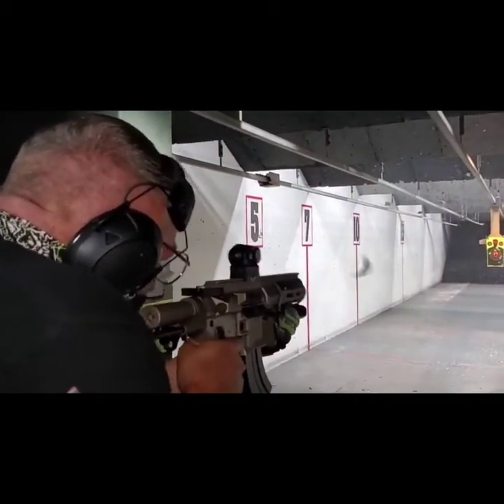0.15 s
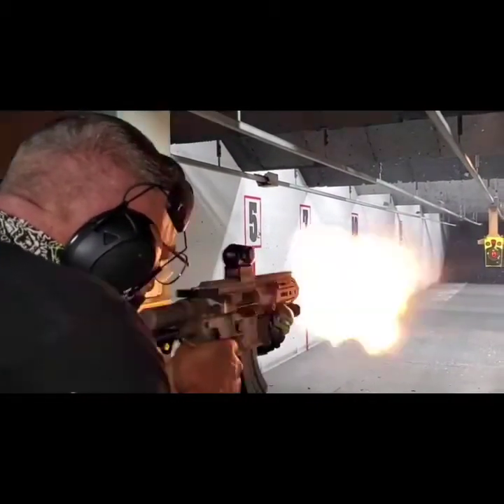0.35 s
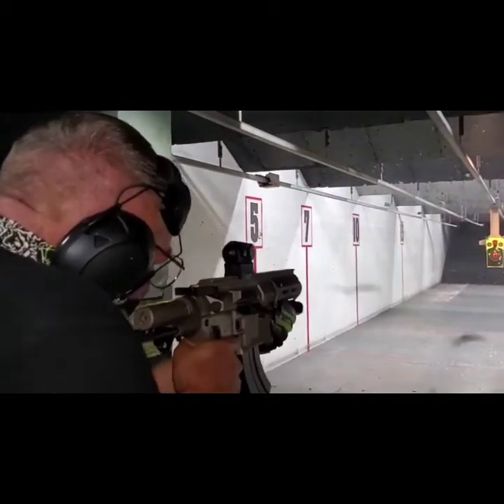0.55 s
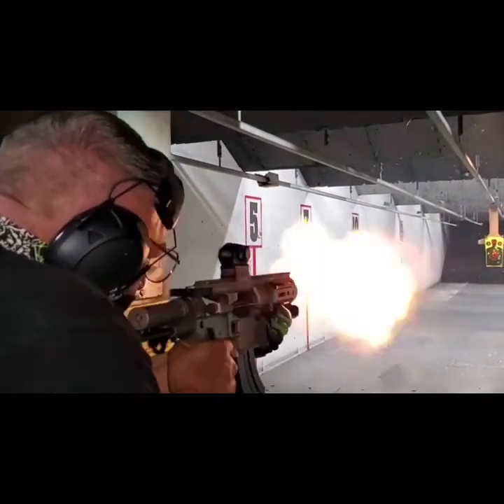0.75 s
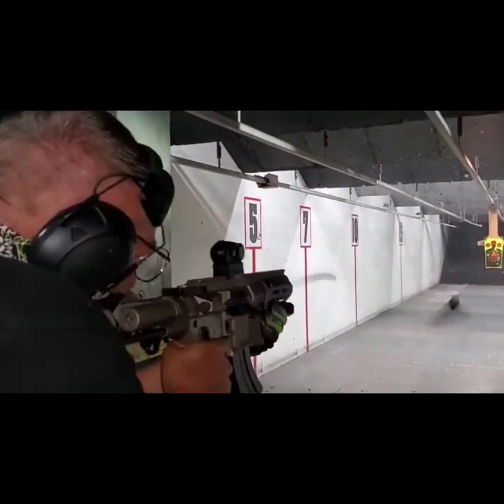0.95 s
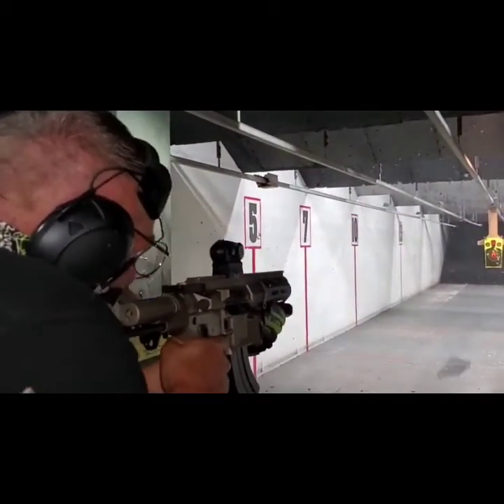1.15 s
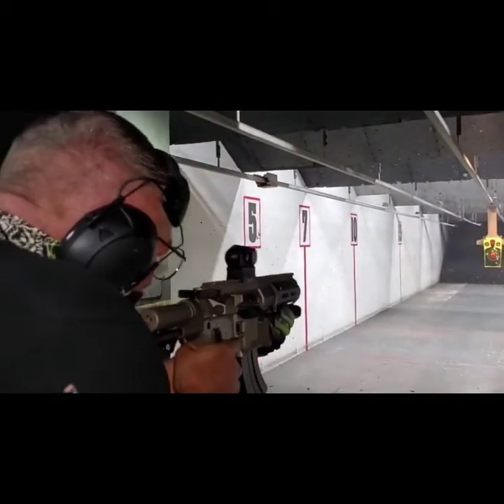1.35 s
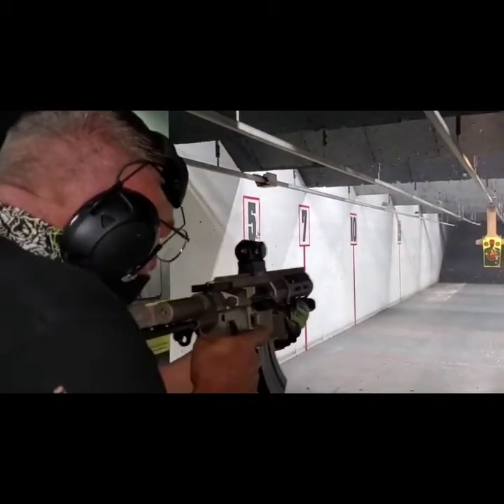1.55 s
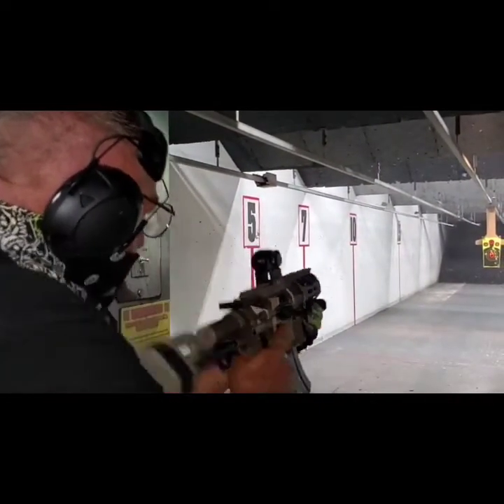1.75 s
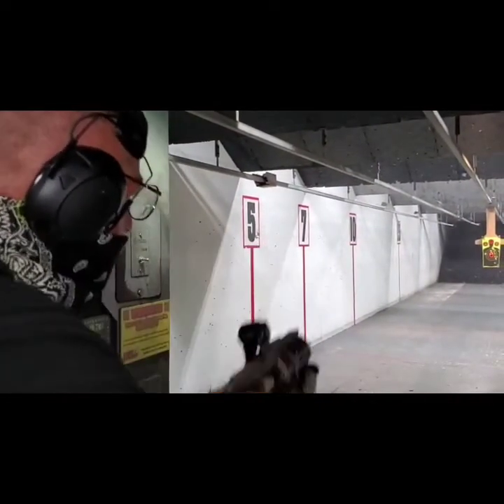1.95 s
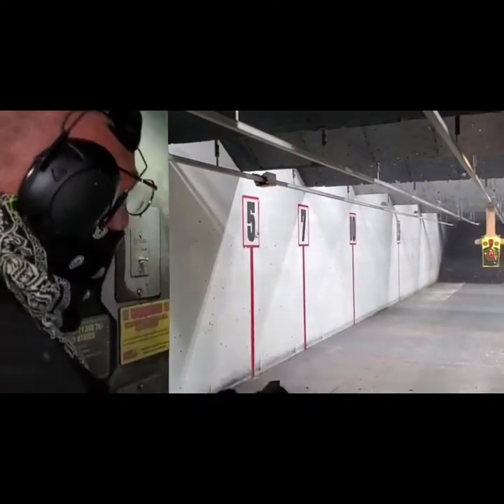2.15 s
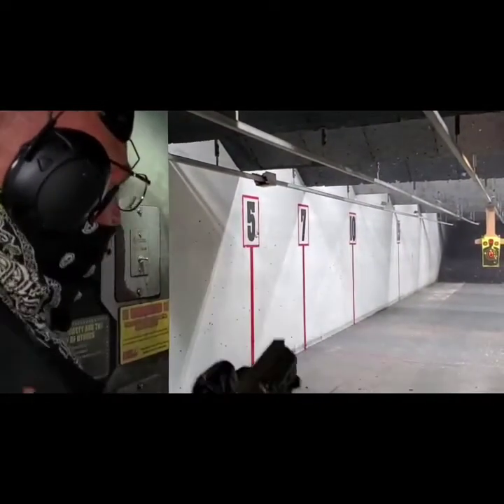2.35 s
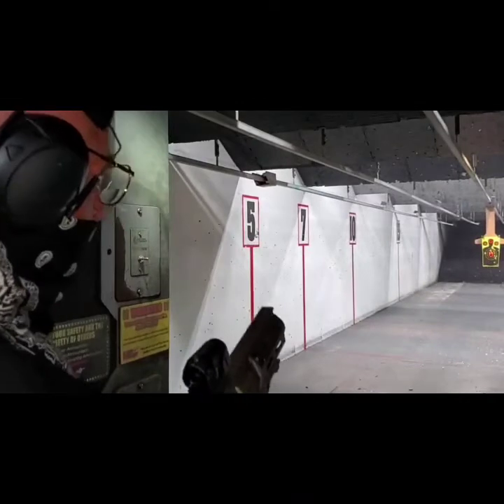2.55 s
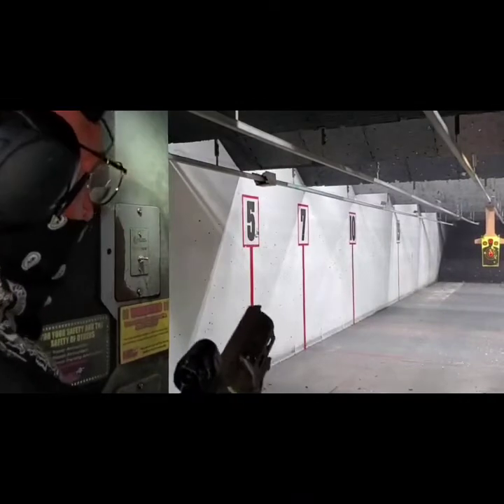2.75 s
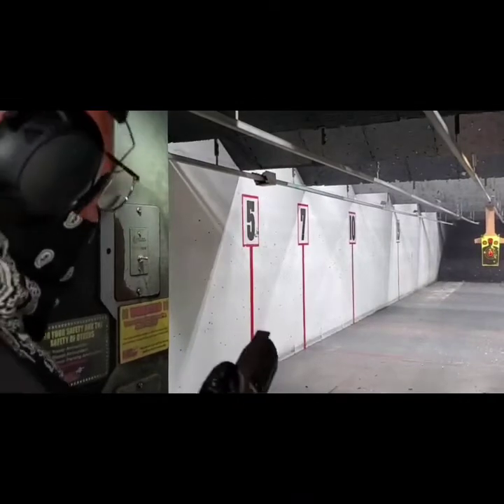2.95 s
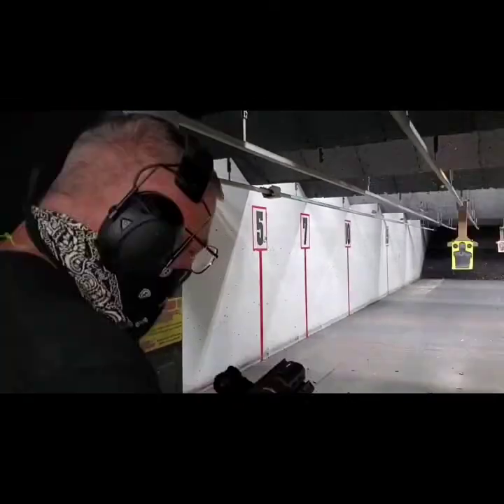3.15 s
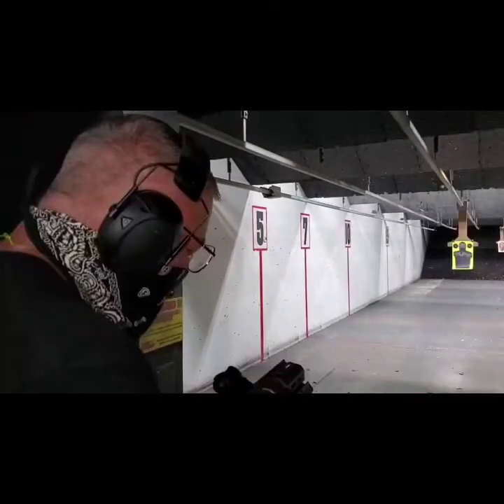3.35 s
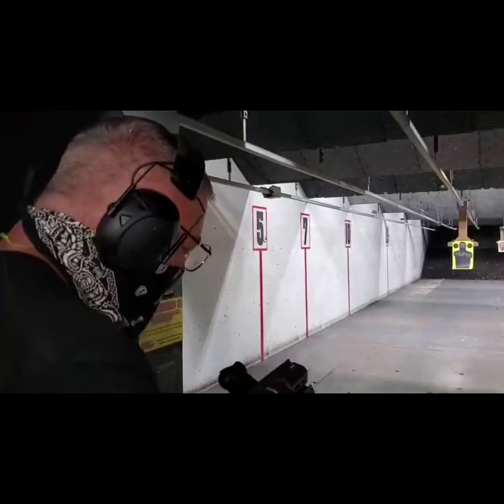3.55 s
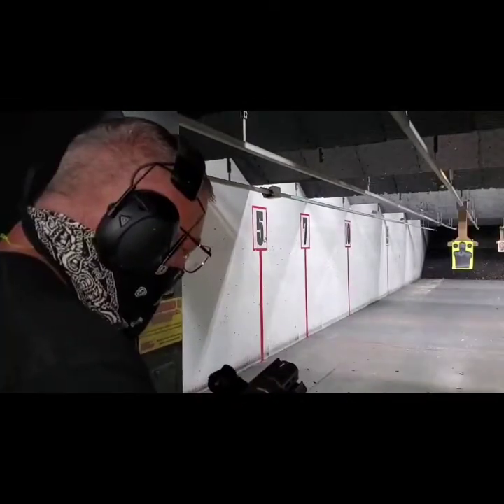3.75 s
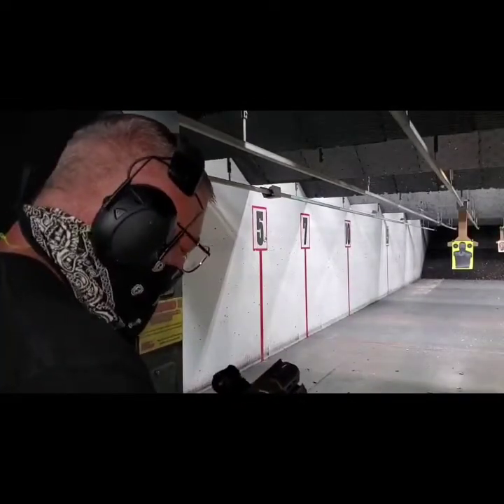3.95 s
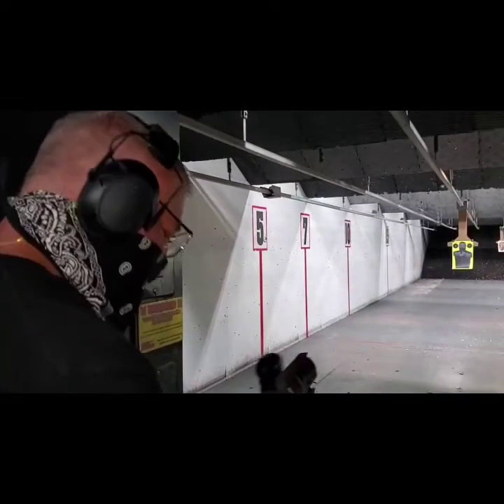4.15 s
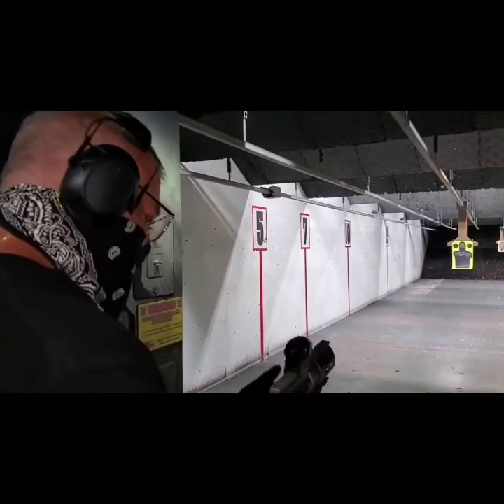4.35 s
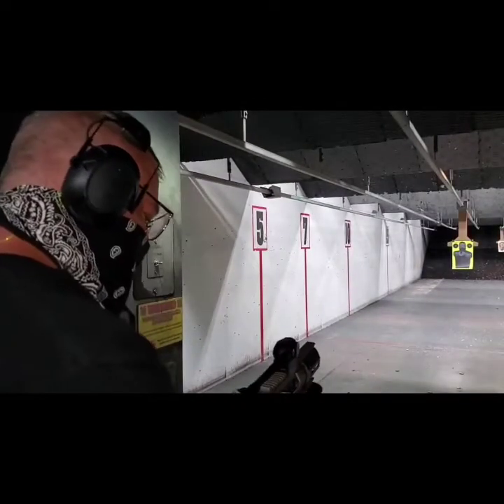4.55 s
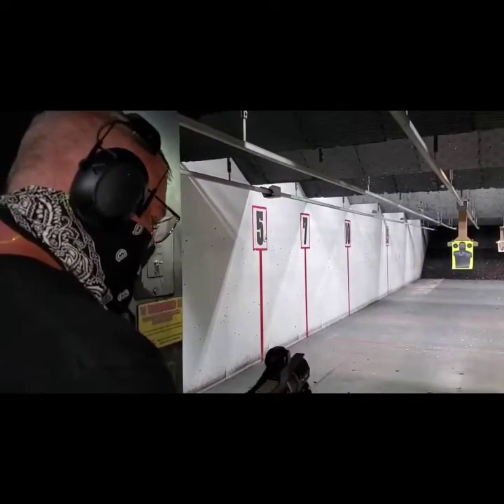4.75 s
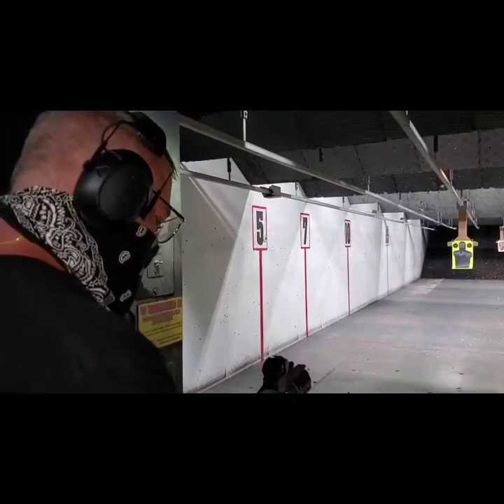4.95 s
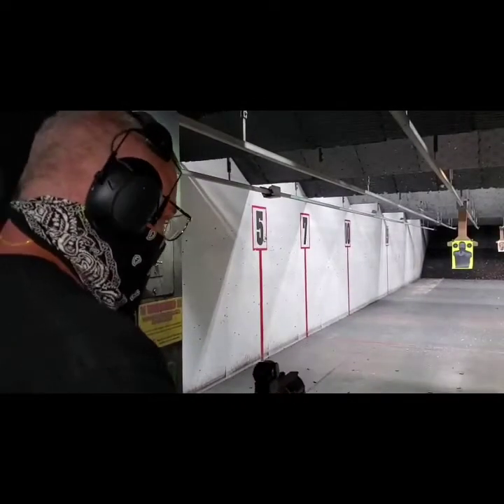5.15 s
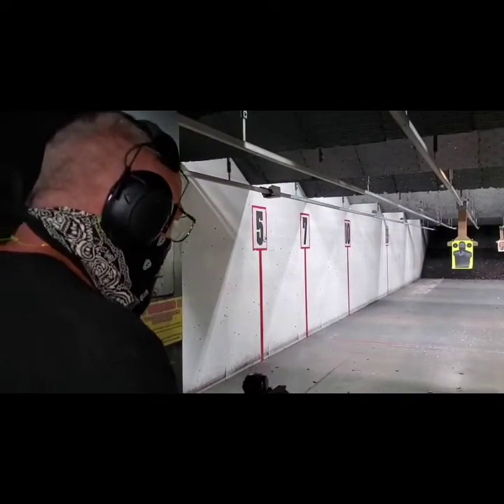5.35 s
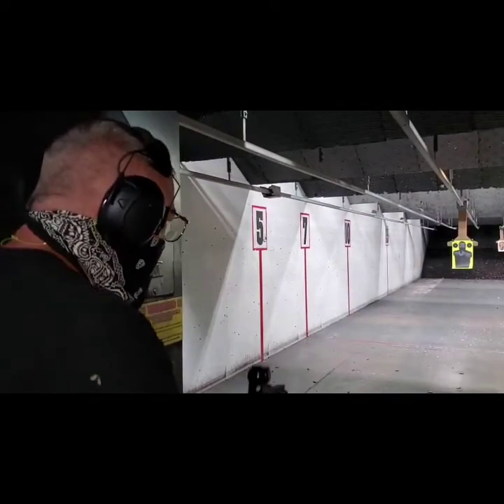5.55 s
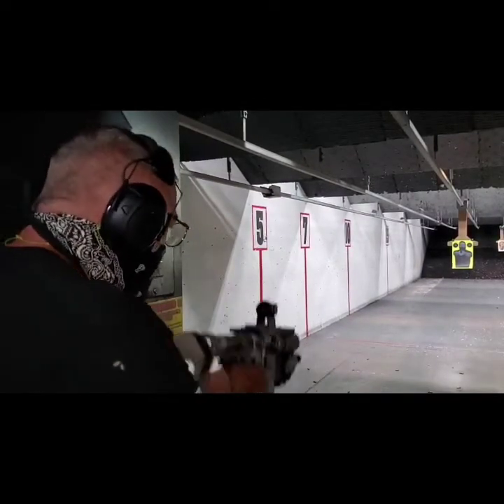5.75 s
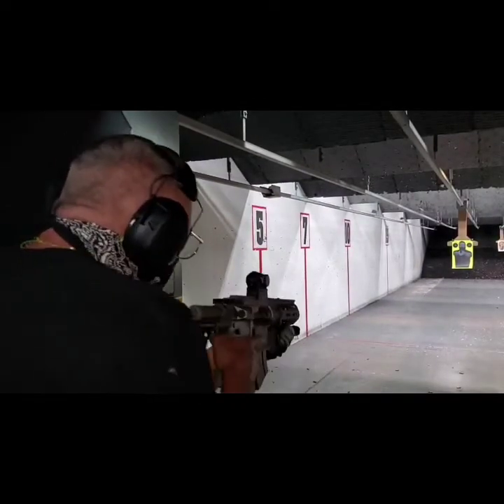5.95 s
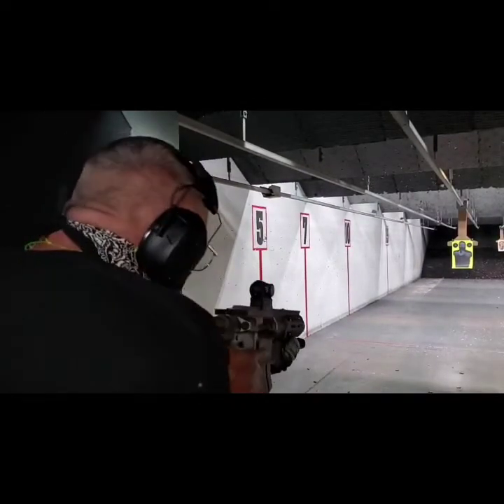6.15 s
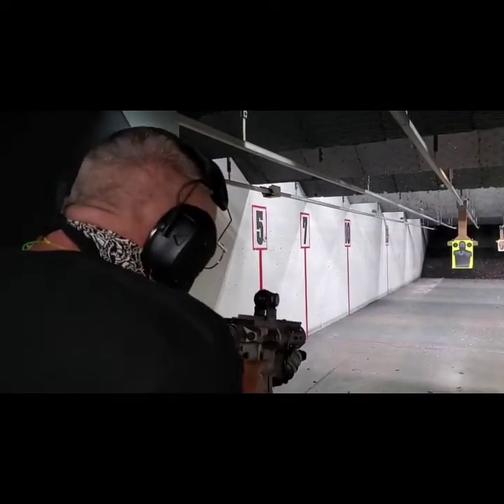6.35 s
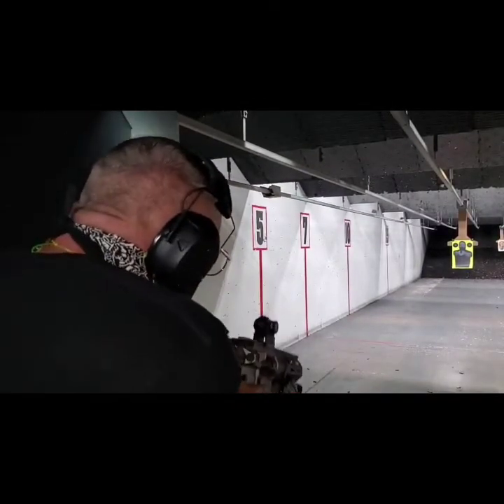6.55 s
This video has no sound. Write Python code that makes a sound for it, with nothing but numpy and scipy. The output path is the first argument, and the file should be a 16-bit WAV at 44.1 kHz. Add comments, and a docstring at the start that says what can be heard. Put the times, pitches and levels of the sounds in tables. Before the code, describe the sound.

The hall is already ringing as a close rifle fires eight shots from 0.0 to 1.1 s, roughly seven per second, each a clipped crack with short booming wall reflections; another lane's shot hides beneath at 0.15. The reverberation dies over nearly two seconds while ducked ventilation rumble returns. A spent case tinkles high at 1.8, with fainter tinkles around 2.6; light steel clicks come at 2.1-2.2 and 2.7-3.2. At 3.23 the sound drops out for an instant, then the air returns with a deeper colour. Dull left-side bumps at 3.3 lead into the bolt's gritty scrape and rapid steel strikes at 3.55-3.62, with a sinking hollow ring. A softened shot from the right-hand lane bursts at 4.0, bumps and a click follow near 4.5, a latch snaps at 5.12, and a stronger lane shot hits at 5.24. Its tail fades past a click at 5.87 and low bumps at 6.5.

```python
"""Indoor shooting range: a rifle fires eight quick shots from a booth, overloading the microphone; the hall rings on.
After a short gap the action slams shut and the gun is handled; another lane fires once before and twice after.
Ventilation rumbles throughout, spent cases tinkle, and a limiter ducks everything under each bang.
Blasts and clatter are shaped noise with dying echoes; booms are gliding tones and metal rings in narrow bands."""
import sys
import numpy as np
from scipy import signal
from scipy.fft import rfft, irfft, next_fast_len
from scipy.io import wavfile
from scipy.ndimage import uniform_filter1d

SR = 44100
rng = np.random.default_rng(int(sys.argv[2]) if len(sys.argv) > 2 else 0)


def master(y):
    """Save y as 16-bit WAV."""
    cut = np.clip(np.atleast_2d(y).T, -1, 1)
    pcm = np.round(cut * 32767)  # scale
    wavfile.write(sys.argv[1], SR, pcm.astype(np.int16))


N = 291942  # length in samples

# Spectrum tables give relative levels; event levels are relative to the layer's own trim.
# ventilation before and after the gap: [f/Hz, level/dB]
AIR_BEFORE = [(15, -40), (25, -30), (45, -22), (57, -1.5), (75, 3), (93, -10.5), (190, -12.5), (330, -16.5),
              (560, -17), (790, -19), (1310, -33.5), (1700, -36), (2370, -37), (9020, -64), (12800, -80.5),
              (15000, -83)]
AIR_AFTER = [(15, -43), (24, -7), (38, -7.5), (54, -3), (118, -4), (172, -14.5), (231, -9.5), (318, -20),
             (438, -17), (529, -19), (573, -20), (903, -23.5), (978, -25), (6540, -50), (10200, -58.5),
             (12000, -72), (15000, -89)]
# resonances of the air ducts: [f/Hz, width/Hz, level/dB]
DUCTS = [(58.4, 12, 9), (106.6, 14, 4.5), (226.6, 3.1, 13)]
# spent cases ringing on the concrete: [t/s, level/dB]
CASES = [(1.795, -46), (2.545, -65.5), (2.665, -69)]
# modes of a brass case: [f/Hz, width/Hz, level/dB, t60/s]
CASE_MODES = [(8260, 500, -13.5, 0.17), (12560, 340, 2.5, 0.079), (12680, 160, -6, 0.27)]
# a latch on the gun snaps over: [t/s, level/dB]
LATCH = [(5.1238, -41)]
# modes of the latch: [f/Hz, width/Hz, level/dB, t60/s]
LATCH_MODES = [(2070, 380, 0, .06), (2910, 700, -4, .06)]
# light clicks of guns being handled: [t/s, level/dB, brightness/(dB per octave), t60/s]
CLICKS = [(2.1, -52, -8, 0.13), (2.16, -40.5, 0, 0.18), (2.705, -65, 1, .25), (2.772, -56.5, -8, .05),
          (2.954, -48.5, -7.5, 0.055), (3.203, -51, -9, 0.068), (4.520, -48, -4, 0.089),
          (5.868, -42, -7, 0.12)]
# steel parts that ring in every click: [f/Hz, width/Hz, level/dB]
STEEL = [(2040, 200, -5), (3060, 200, 4), (4760, 290, -8), (6100, 870, 8.5)]
# clatter of steel on steel: [f/Hz, level/dB]
CLATTER = [(150, -36), (430, -17), (680, 7.5), (950, 5.5), (1600, 8.5), (2900, 9), (5000, 8), (8000, 4),
           (12500, 4), (15000, -2.5)]
# dull bumps beside the left port: [t/s, level/dB, f/Hz, cycles until the crest]
BUMPS = [(2.845, -23, 124.5, 0.64), (3.2946, -12, 203.5, 0.81), (3.3044, -13, 157, 0.78),
         (3.3152, -18, 470, 0.46), (3.3192, -5, 116, 0.53), (3.34, -21, 177, 1), (3.362, -14.5, 61.6, 0.47),
         (4.469, -16, 112, 0.77), (6.5237, -22, 380, .6), (6.5259, -2.5, 151, 0.46),
         (6.534, -4.5, 97.8, 0.8), (6.553, -20, 377, 0.4), (6.605, -23, 148, 0.64)]
# the bolt runs home, striking its catch, the round, the guide and the lock:
# [t/s, level/dB, ring f/Hz, rise/s, hold/s, t60/s, clatter level/dB]
BOLT_STRIKES = [(3.5532, -6, 4780, 0.00056, 0.00097, .013, -1.5),
                (3.5657, -4.5, 2276, 0.0084, 0.0011, 0.016, -2), (3.582, -12, 1950, .0003, .002, .022, 3),
                (3.5912, -13.5, 1020, .001, 0.0024, .035, -5),
                (3.5927, -13.5, 1840, 0.0016, 0.0044, .03, -1),
                (3.6070, -13, 2870, .0006, 0.0017, 0.037, -2), (3.6187, -14.5, 6400, .0005, .0005, .01, -7)]
# the scrape sounds through the receiver: [f/Hz, width/Hz, level/dB]
RECEIVER = [(1000, 270, 6), (1880, 300, -1), (2800, 300, 4)]
# shots from another lane: [t/s, crack level/dB, hall level/dB]
LANE_SHOTS = [(.151, -9, -10.5), (3.999, -9, -17.5), (5.2411, -3.5, -13.5)]
# spectra of their crack and hall sound: [f/Hz, level/dB]
LANE_CRACK = [(40, 10.5), (70, 18.5), (160, -19), (280, -2), (450, 11.5), (680, 8), (950, 0), (1400, -2),
              (2300, 1), (3500, -7.5), (5500, -7), (8000, -14.5), (13000, -14.5), (15000, -28)]
LANE_HALL = [(50, -8.5), (100, 8.5), (170, -10), (300, -5), (600, 2.5), (950, -0.5), (1500, -8.5),
             (2400, -13.5), (4000, -22), (7000, -29), (11000, -30), (15000, -20.5)]
# the way from that lane colours hall and crack: [f/Hz, width/Hz, level/dB]
LANE_HALL_PEAKS = [(280, 56, 7.5), (1760, 280, -5.5), (2283, 500, 6.5), (5550, 750, 11), (8800, 1500, 7.5)]
LANE_CRACK_PEAKS = [(267, 90, 6.5), (910, 200, 2.87), (2105, 700, 4.5), (5570, 800, 2.5)]
# how fast their crack dies: [f/Hz, t60/s]
LANE_CRACK_T60 = [(100, 0.35), (400, 0.3), (1500, 0.3), (5000, 0.28), (14000, 0.21)]
# the near rifle: [t/s, crack level/dB, boom level/dB, boom depth/(dB per octave down),
# bite f/Hz, bite level/dB]
SHOTS = [(.009, -9, 1, -5.5, 2200, 2), (.213, -6.5, 0, -3, 2200, 4), (.372, -4.5, -1.5, -1.5, 1520, 0),
         (.522, -5, -2.5, 6, 1000, 1.5), (.659, -7, -0.5, 5.5, 1206, 2), (.808, -4.5, -1.5, -3, 1500, 1),
         (.927, -4.5, -2, 4.5, 2590, 2), (1.072, -5.5, 0.5, -4, 1700, 0.5)]
# spectra of its crack and hall sound: [f/Hz, level/dB]
CRACK = [(50, -31.5), (150, 6.5), (400, -1.5), (850, 2), (1500, -1), (2700, -8.5), (5000, -13), (7500, -20),
         (12000, -17), (15000, -21)]
HALL = [(20, -46.5), (42, -19), (55, -4.5), (80, -1), (110, -1), (140, -3.5), (230, -5), (390, 0),
        (750, -4), (1200, -10), (2200, -13), (3600, -12), (4900, -20.5), (6000, -19.5), (10000, -24),
        (15000, -20.5)]
# booms the walls throw back, before each shot's scatter: [f/Hz, glide/(Hz per s), level/dB, crest/s, spread/s]
BOOM = [(203, 1.5, -7, .023, 0.009), (255.6, 3000, -0.5, .042, 0.0047), (556, -2500, -12, .033, 0.0053),
        (436, -4500, -4, .048, 0.0071), (298, -9000, -7.5, 0.066, 0.0049),
        (124, -2500, -10.5, .067, 0.0091), (102, -200, -14.5, .096, 0.025), (403, 1501, -7.5, 0.103, .0075)]
# standing waves of the booth: [f/Hz, width/Hz, level/dB]
BOOTH = [(72.4, 23, 5.5), (222.3, 12, 9.5), (450, 14, 5), (282.4, 8, 3), (364.7, 9, 2.5), (560, 17, 6.5),
         (823, 33, 3), (885, 16, 4), (938, 18, 3.5), (1123, 13.5, 3), (1354, 9.1, 4), (1513, 21, 6.5),
         (1715, 30, 0.5), (1900, 30, 5)]
# reverberation of the hall: [f/Hz, t60/s]
HALL_T60 = [(30, 1.7), (86, 2.2), (200, 1.86), (500, 1.735), (1500, 1.557), (3500, 1.397), (6000, 1.12),
            (10000, 0.81), (15000, 0.35)]
# how alike one shot's echoes are to the next: [f/Hz, share 0-1]
ALIKE = [(60, 0.94), (250, 1), (500, 1), (1200, 0.61), (3000, 0.36), (9000, 0)]

GAP_START_S, GAP_END_S = 3.229, 3.254
# the background creeps up on both sides of the gap, and comes back louder for a moment before it settles
AIR_BEFORE_DB, AIR_BEFORE_DB_PER_S = -37, 7
AIR_AFTER_DB, AIR_AFTER_DB_PER_S = -36, 1.67
AIR_SURGE_DB, AIR_SETTLE_S = 11.5, 0.27
# the rumble dips briefly under the bolt's hollow ring
DIP_S, DIP_SPREAD_S, DIP_DB = 3.624, 0.013, -14
# the bolt's scrape around its loudest moment
SCRAPE_CREST_S, SCRAPE_RISE_S, SCRAPE_HOLD_S, SCRAPE_T60_S = 3.582, 0.041, 0.031, 0.17
# its hollow ring sinks, and is loudest as the scrape dies
SINK_FROM_HZ, SINK_TO_HZ, SINK_S = 2200, 500, .008
HOLLOW_CREST_S, HOLLOW_SPREAD_S = 3.621, .015
TOP_HZ = 14800  # upper band limit


def amp(db):
    """Decibels to gain."""
    return 10 ** (np.asarray(db) / 20)


def evened(x):
    """Scaled to rms 1."""
    return x / np.sqrt(np.mean(x ** 2) + 1e-20)


def read(points, hz):
    """A curve joined by straight lines over log frequency."""
    f, value = np.transpose(points)
    return np.interp(np.log(hz + 1), np.log(f + 1), value)


def bell(hz, centre_hz, width_hz):
    """Height 0-1 of a resonance."""
    return 1 / (1 + (2 * (hz - centre_hz) / width_hz) ** 2)


def add(mix, s, sound):
    """Mixes a sound in at time s."""
    part = mix[:, round(s * SR):][:, :sound.shape[1]]
    part += sound[:, :part.shape[1]]


def fall(t, t60):
    """Dies by 60 dB in t60 seconds."""
    return np.exp(-np.log(1000) * t / t60)


def rise(t, rise_s):
    """A soft start."""
    return 1 - np.exp(-t / rise_s)


def swell(t, crest_s, spread_s):
    """A smooth rise and fall around a crest."""
    return np.exp(-.5 * ((t - crest_s) / spread_s) ** 2)


def glide(t, hz, hz_per_s, crest_s, spread_s):
    """A few cycles that swell and fade while their pitch slides."""
    since = t - crest_s
    return swell(t, crest_s, spread_s) * np.cos(2 * np.pi * (hz + hz_per_s * since / 2) * since)


def ragged(length, depth_db):
    """Single reflections make the level jump from one millisecond to the next."""
    jumps = evened(uniform_filter1d(rng.standard_normal(length), size=50))
    return evened(amp(depth_db * jumps))


def field(size, gain, count=1, side_bias=0, port_gap_ms=0.461):
    """Count related noises (rms 1, spectrum gain(hz)) arriving from all round at two ports a hand apart."""
    hz = np.fft.rfftfreq(size, 1 / SR)
    across = np.cos(np.linspace(0, np.pi, 48))  # directions from one side to the other
    grid = np.linspace(0, SR / 2, 600)
    turns = np.outer(grid, across) * port_gap_ms / 1000
    weights = np.exp(side_bias * across)
    likeness = np.average(np.exp(2j * np.pi * turns), axis=1, weights=weights)
    same = np.interp(hz, grid, likeness) * .98
    # the same walls answer every shot, so long waves repeat and short ones vary
    alike = np.clip(read(ALIKE, hz), 0, 1)
    white = rfft(rng.standard_normal((count + 1, 2, size)))
    shots = np.sqrt(alike) * white[0] + np.sqrt(1 - alike) * white[1:]
    left, other = np.swapaxes(shots, 0, 1)
    right = np.conj(same) * left + np.sqrt(1 - abs(same) ** 2) * other
    return np.squeeze(evened(irfft(np.stack([left, right], axis=1) * gain(hz), size)))


def coloured(size, spectrum, peaks=(), count=1, side_bias=0):
    """Such noise with a broad spectrum and resonances on top."""
    def gain(hz):
        return amp(read(spectrum, hz) + sum(db * bell(hz, f, w) for f, w, db in peaks))
    return field(size, gain, count, side_bias)


def recoloured(x, depth_db, count=8, delay_s=0.001583):
    """Close reflections comb each hit a little differently."""
    hz = np.fft.rfftfreq(x.shape[1], 1 / SR)
    ripple = sum(np.cos(2 * np.pi * (hz * delay * delay_s + turn)) for delay, turn in rng.random((count, 2)))
    return evened(irfft(rfft(x) * amp(depth_db * evened(ripple)), x.shape[1]))


def dying(x, t60s, patchy_db=1.15):
    """Lets each frequency die at its own speed, in uneven patches as echoes bunch and thin out."""
    hz, t, z = signal.stft(x, SR, nperseg=512)
    patches = uniform_filter1d(rng.standard_normal(z.shape[1:]), size=3, axis=0)
    patches = evened(uniform_filter1d(patches, size=4, axis=1))
    gain = amp(-60 * t / read(t60s, hz)[:, None]) * evened(amp(patchy_db * patches))
    return signal.istft(z * gain, SR, nperseg=512)[1][:, :x.shape[1]]


def answer(t, rise_s=.018):
    """The hall's answer to a clatter of metal."""
    return rise(t, rise_s) * dying(coloured(len(t), CLATTER), HALL_T60)


def ventilation():
    """Rumble of ducts and rush of air as steady shaped noise, with another colour after the gap."""
    t = np.arange(N) / SR
    since = t - (GAP_START_S + GAP_END_S) / 2
    size = next_fast_len(N)
    before_db = AIR_BEFORE_DB + AIR_BEFORE_DB_PER_S * since
    surge_db = AIR_SURGE_DB * np.exp(-abs(since) / AIR_SETTLE_S)
    after_db = AIR_AFTER_DB + AIR_AFTER_DB_PER_S * since + surge_db
    before = amp(before_db) * coloured(size, AIR_BEFORE)[:, :N]
    after = amp(after_db) * coloured(size, AIR_AFTER, DUCTS)[:, :N]
    return np.where(since < 0, before, after) * amp(DIP_DB * swell(t, DIP_S, DIP_SPREAD_S))


def pings(events, modes, rise_s=0.00086):
    """A small metal part is tapped and rings in its modes, each a dying band of noise."""
    out, t = np.zeros((2, N)), np.arange(SR // 2) / SR
    for s, db in events:
        for f, width, mode_db, t60 in modes:
            ring = field(len(t), lambda hz: bell(hz, f, width))
            add(out, s, amp(db + mode_db) * fall(t, t60) * rise(t, rise_s) * ring)
    return out


def clicks(colour_db=3, ragged_db=2, room_db=-35):
    """Small taps ring the same steel parts, each with its own brightness, and the hall answers faintly."""
    out, t = np.zeros((2, N)), np.arange(SR) / SR
    for s, db, bright_db, t60 in CLICKS:
        # the tilt sets in above the lowest steel part
        spectrum = [(f, level + bright_db * np.log2(max(f / STEEL[0][0], 1))) for f, level in CLATTER]
        tap = recoloured(coloured(len(t), spectrum, STEEL), colour_db)
        tap = tap * ragged(len(t), ragged_db) * fall(t, t60)
        add(out, s, amp(db) * (tap + amp(room_db) * answer(t)))
    return out


def bumps(right_db=-18, rub_db=-13, rub_length=1.9, rub_width=2.0):
    """A soft push gives a few cycles of low wobble and a dull rub, mostly in the left port."""
    out, t = np.zeros((2, N)), np.arange(SR // 4) / SR
    for s, db, f, cycles in BUMPS:
        u = t * f / cycles  # reaches 1 at the crest
        wobble = u * np.exp(1 - u) * np.sin(2 * np.pi * f * t)
        rub_level = u / rub_length * np.exp(1 - u / rub_length)
        rub = rub_level * field(len(t), lambda hz: bell(hz, f, rub_width * f))
        add(out, s, amp(db) * (amp(rub_db) * rub - wobble) * amp([[0], [right_db]]))
    return out


def bolt(ring_db=6, ring_width=0.45, scrape_db=-14, scrape_ragged_db=1.0, grit_db=-5, grit_per_s=2600,
         hollow_db=-29, room_db=-35):
    """Steel on steel: ringing strikes in a gritty scrape, a hollow ring that sinks, a faint answer from the hall."""
    out, t = np.zeros((2, N)), np.arange(SR) / SR
    for s, db, f, rise_s, hold_s, t60, clatter_db in BOLT_STRIKES:
        ring = field(len(t), lambda hz: bell(hz, f, ring_width * f))
        clatter = evened(coloured(len(t), CLATTER) + amp(ring_db) * ring)
        contact = np.minimum(t / rise_s, 1) * fall(np.maximum(t - rise_s - hold_s, 0), t60)
        add(out, s, amp(db) * contact * (amp(clatter_db) * clatter + np.sin(2 * np.pi * f * t)))
    start = BOLT_STRIKES[0][0]
    since = start + t - SCRAPE_CREST_S
    scrape_fall = fall(np.maximum(since - SCRAPE_HOLD_S, 0), SCRAPE_T60_S)
    level = np.exp(np.minimum(since, 0) / SCRAPE_RISE_S) * scrape_fall
    # tiny catches of the sliding steel
    catches = rng.choice([-1, 1], len(t)) * (rng.random(len(t)) < grit_per_s / SR)
    steel_gain = amp(read(CLATTER, np.fft.rfftfreq(len(t), 1 / SR)))
    grit = evened(irfft(rfft(catches) * steel_gain, len(t)))
    scrape = evened(coloured(len(t), CLATTER, RECEIVER) + amp(grit_db) * grit)
    add(out, start, amp(scrape_db) * level * scrape * ragged(len(t), scrape_ragged_db))
    sink_hz = SINK_TO_HZ + (SINK_FROM_HZ - SINK_TO_HZ) * np.exp(-np.maximum(since, 0) / SINK_S)
    hollow_level = swell(start + t, HOLLOW_CREST_S, HOLLOW_SPREAD_S)
    hollow = hollow_level * np.sin(2 * np.pi * np.cumsum(sink_hz) / SR)
    add(out, start, amp(hollow_db) * hollow[None])
    add(out, SCRAPE_CREST_S, amp(room_db) * answer(t))
    return out


def other_lane(crack_rise=0.0035, crack_ragged_db=2, thump_db=-10, thump_hz=270, thump_width_hz=130,
               thump_crest_s=0.032, thump_spread_s=0.019, hall_rise=0.055, hall_patchy_db=0.46, ring=0.97,
               side_bias=-0.024, left_db=-0.75):
    """Blasts round the partition from the right: a softened crack that darkens, a thump off the walls, the hall."""
    out, t, count = np.zeros((2, N)), np.arange(2 * SR) / SR, len(LANE_SHOTS)
    hall_t60s = [(f, ring * t60) for f, t60 in HALL_T60]
    cracks = coloured(len(t), LANE_CRACK, LANE_CRACK_PEAKS, count, side_bias)
    halls = coloured(len(t), LANE_HALL, LANE_HALL_PEAKS, count, side_bias)
    thumps = field(len(t), lambda hz: bell(hz, thump_hz, thump_width_hz), count)
    thumps = thumps * swell(t, thump_crest_s, thump_spread_s)
    for (s, crack_db, hall_db), crack, thump, hall in zip(LANE_SHOTS, cracks, thumps, halls):
        # the bend round the partition rounds off the front of the blast
        crack = rise(t, crack_rise) ** 2 * dying(crack, LANE_CRACK_T60)
        add(out, s, amp(crack_db) * crack * ragged(len(t), crack_ragged_db))
        add(out, s, amp(crack_db + thump_db) * thump)
        add(out, s, amp(hall_db) * rise(t, hall_rise) * dying(hall, hall_t60s, hall_patchy_db))
    return out * amp([[left_db], [0]])


def rifle(crack_db=3.5, crack_hold=0.013, crack_t60=0.29, crack_ragged_db=2.0, crack_colour_db=1.86,
          bite_width=0.69, boom_db=-0.2, body_db=-9, boom_scatter=0.021, boom_scatter_db=1.3,
          hall_db=-5.5, hall_rise=0.049, earlier_db=-11):
    """Each blast rattles between the booth walls, comes back as short booms and fills the hall."""
    out, t, count = np.zeros((2, N)), np.arange(2 * SR) / SR, len(SHOTS)
    early = t[:SR // 2]
    early_hz = np.fft.rfftfreq(len(early), 1 / SR)
    cracks = coloured(len(early), CRACK, BOOTH, count)
    snap = rise(early, 0.00089) * fall(np.maximum(early - crack_hold, 0), crack_t60)
    bodies = field(len(early), lambda hz: bell(hz, 550, 500), count) * swell(early, 0.045, 0.016)
    halls = coloured(len(t), HALL, BOOTH, count)
    # every shot scatters the pitch and level of its booms
    detunes = 1 + boom_scatter * rng.standard_normal((count, len(BOOM)))
    strays_db = boom_scatter_db * rng.standard_normal((count, len(BOOM)))
    for shot, crack, body, hall, detune, stray_db in zip(SHOTS, cracks, bodies, halls, detunes, strays_db):
        s, shot_crack_db, shot_boom_db, depth_db, bite_hz, bite_db = shot
        bite = amp(bite_db * bell(early_hz, bite_hz, bite_width * bite_hz))
        crack = irfft(rfft(crack) * bite, len(early))
        crack = snap * recoloured(crack, crack_colour_db)
        add(out, s, amp(crack_db + shot_crack_db) * crack * ragged(len(early), crack_ragged_db))
        boom = np.zeros(len(early))
        for (f, slope, db, crest, spread), off, off_db in zip(BOOM, detune, stray_db):
            # depth tilts the booms around 300 Hz
            level_db = db + off_db + depth_db * np.log2(300 / max(f, 200))
            boom += amp(level_db) * glide(early, f * off, slope, crest, spread)
        add(out, s, amp(shot_boom_db) * (amp(boom_db) * boom + amp(body_db) * body))
        add(out, s, amp(hall_db) * rise(t, hall_rise) * dying(hall, HALL_T60))
    # the hall is already ringing from earlier fire
    add(out, 0, amp(earlier_db) * dying(coloured(len(t), HALL, BOOTH), HALL_T60))
    return out


def scene():
    """Ventilation, then brass and handling, with the gunfire on top."""
    brass_and_latch = pings(CASES, CASE_MODES) + pings(LATCH, LATCH_MODES)
    handling = clicks() + bumps() + bolt()
    gunfire = other_lane() + rifle()
    return ventilation() + brass_and_latch + handling + gunfire


def limiter(x, threshold_db=-16, slope=0.41, recover_db_per_s=90, treble_weight=3):
    """Turns down at once when the sound is loud, above all when it is bright, and recovers gradually."""
    sensed = x ** 2 + (treble_weight * np.diff(x, prepend=0)) ** 2
    power_db = 10 * np.log10(abs(uniform_filter1d(sensed.mean(0), size=130)) + 1e-12)
    recovery = recover_db_per_s * np.arange(N) / SR
    held_db = np.maximum.accumulate(power_db + recovery) - recovery  # peaks sink at the recovery speed
    over_db = np.maximum(held_db - threshold_db, 0)
    return x * amp(-min(slope, 1) * uniform_filter1d(over_db, size=60))


def record(dry, low_cut_hz=28, overload_db=9):
    """The microphone overloads, the limiter holds the level, a short gap opens; then the band limit."""
    overloaded = amp(overload_db) * np.tanh(dry / amp(overload_db))
    held = limiter(overloaded)
    held = signal.sosfilt(signal.butter(2, low_cut_hz, "highpass", fs=SR, output="sos"), held)
    # the highest peaks are rounded off just under full scale
    held = held / (1 + (held / .92) ** 8) ** (1 / 8)
    t = np.arange(N) / SR
    outside_s = np.maximum(GAP_START_S - t, t - GAP_END_S)
    gap = np.clip(outside_s / .006 + .5, .02, 1)  # 6 ms slopes, almost silent between
    band = signal.firwin(801, TOP_HZ, window=("kaiser", 9), fs=SR)
    return signal.oaconvolve(held * gap, band[None], "same")


dry = scene()
out = record(dry)
master(out)
```